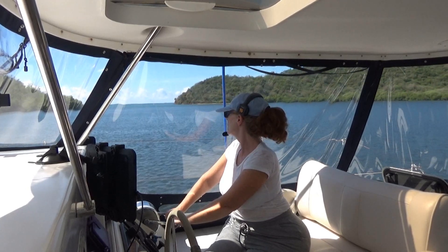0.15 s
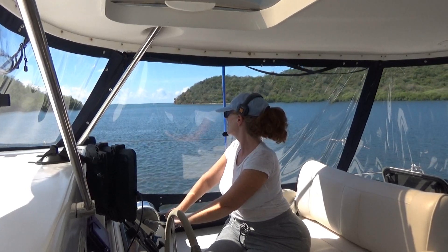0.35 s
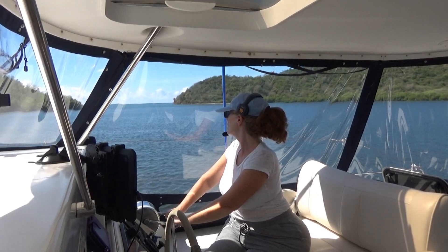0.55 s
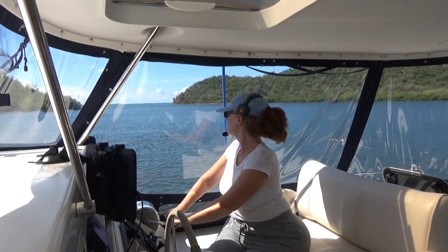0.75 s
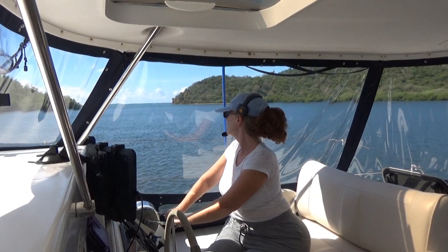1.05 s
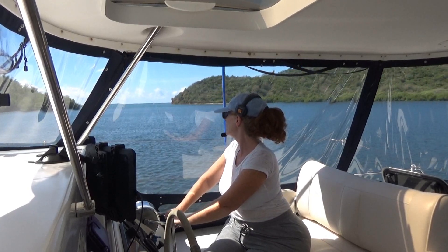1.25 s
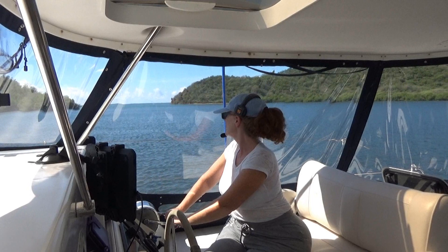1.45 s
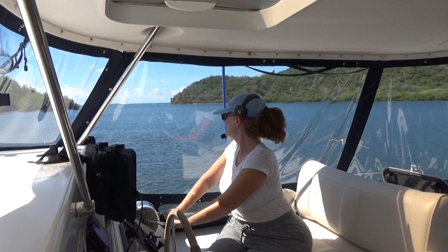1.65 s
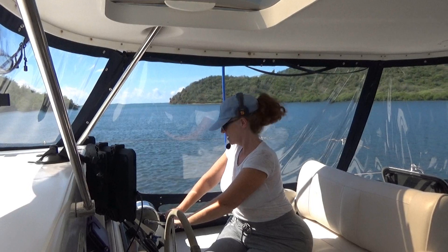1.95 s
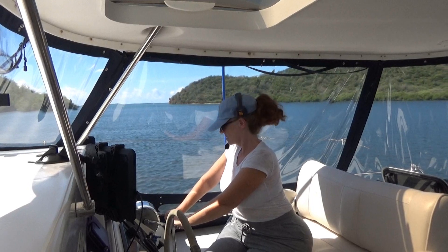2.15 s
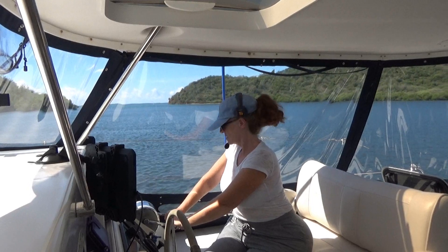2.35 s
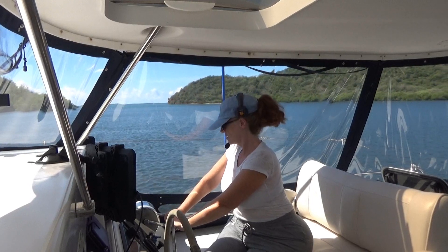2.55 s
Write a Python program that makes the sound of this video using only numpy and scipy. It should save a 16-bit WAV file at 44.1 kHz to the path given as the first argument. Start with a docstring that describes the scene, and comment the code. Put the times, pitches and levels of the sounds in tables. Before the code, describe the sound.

A steady low diesel rumble fills the boat's enclosed helm, two engines beating slightly against each other, the cabin boom swelling and fading; soft knocks come and go, and one engine quickens near the end.

```python
"""Twin marine diesels at idle

Two six-cylinder diesels idle under the deck of a motor boat, heard from the covered helm above.
Harmonic sums locked to each shaft make the exhaust drones, which beat; pulse trains through decaying
modes make the valve ticks. Shaped noise and narrow resonances make the roar and ringing hull panels.
A cabin boom swells and sinks, dull thuds knock, and the slower engine speeds up at the end."""
import sys
import numpy as np
from scipy import signal
from scipy.fft import rfft, irfft
from scipy.io import wavfile
from scipy.ndimage import uniform_filter1d

SR = 44100
rng = np.random.default_rng(int(sys.argv[2]) if len(sys.argv) > 2 else 0)


def persist_wave(psi):
    """Save psi, clipped to +-1, as 16-bit WAV."""
    counts = np.round(np.clip(psi, -1, 1) * 32767).astype(np.int16)
    wavfile.write(sys.argv[1], SR, np.atleast_2d(counts).T)


N = 119070  # samples


def gain_of(db):
    """Level definition: amplitude ratio from dB."""
    return 10 ** (np.asarray(db) / 20)


def evened(x):
    """Normalization by mean power: scales to rms 1."""
    return x / np.sqrt(np.mean(x ** 2) + 1e-20)


def read(points, hz):
    """Interpolation of a spectrum table on a logarithmic frequency axis."""
    f, value = np.transpose(points)
    return np.interp(np.log(hz + 1), np.log(f + 1), value)


def curve(points):
    """Linear interpolation of a time table at every sample."""
    return np.interp(np.arange(N) / SR, *np.transpose(points))


def wander(top_hz):
    """Superposition of slow sines with random phases: a fluctuation of rms 1."""
    t = np.arange(0, N + 256, 256) / SR
    slow = sum(np.sin(2 * np.pi * (f * t + rng.random())) / np.sqrt(f)
               for f in np.geomspace(top_hz / 12, top_hz, 12))
    return np.interp(np.arange(N) / SR, t, evened(slow))


# shaft speed of each engine: t/s, f/Hz (turns per second)
FAST_SPEED = [(0, 17.336), (2.7, 17.336)]
SLOW_SPEED = [(0, 16.072), (2.2, 16.072), (2.41, 17.0), (2.7, 17.35)]


def shaft_turns(speed):
    """Phase as the integral of frequency: turns made since the start."""
    return np.cumsum(curve(speed)) / SR


# exhaust tones: multiple of the shaft speed, rms level/dB before drone level and waver
FAST_ORDERS = [(2, -60), (3, -44), (7, -51.5), (8, -71.5), (9, -31.5), (10, -41), (13, -44), (15, -47.5),
               (17, -40), (18, -35.5), (20, -40), (21, -40.5), (22, -45)]
SLOW_ORDERS = [(2, -43), (3, -38), (4, -37.5), (6, -39.5), (8, -33), (9, -25.5), (10, -54), (11, -34.5),
               (12, -44.5), (14, -46), (16, -43.5), (17, -38.5), (19, -48.5), (22, -40), (25, -52.5),
               (28, -42.5)]
# gain of the whole exhaust drone: t/s, level/dB
FAST_DRONE = [(0, 2.5), (.3, -5), (.8, 1.5), (1.3, -1.5), (1.65, 3), (1.85, -6), (2.2, 0.5), (2.45, -0.5),
              (2.7, -1)]
SLOW_DRONE = [(0, 0), (.08, -6), (.3, -4), (.6, -5), (1.0, -1), (1.9, 0.5), (2.2, -2.5), (2.45, -3.5),
              (2.7, -5)]
FAST_FIRES_AT, SLOW_FIRES_AT = .913, .056  # place of a firing in the turn, 0-1
FIRINGS = 3  # firings a turn
WAVER_DB, WAVER_HZ = 2.5, 5.044  # rms depth, fastest rate


def exhaust(turns, fires_at, orders, drone):
    """Fourier synthesis of shaft orders, each wavering; firing orders crest together at each firing."""
    out = np.zeros(N)
    for order, db in orders:
        # multiples of the firing rate share a phase, the other orders take a random one
        phase = rng.random() * (order % FIRINGS > 0)
        level = np.sqrt(2) * gain_of(db + WAVER_DB * wander(WAVER_HZ))
        out += level * np.cos(2 * np.pi * (order * (turns - fires_at) + phase))
    return gain_of(curve(drone)) * out


# valve ticks in each turn: place in the turn 0-1, relative level/dB, centre of the ringing region f/Hz
FAST_TICKS = [(.02, -5, 6500), (.19, -1, 7250), (.365, 1, 5300), (.52, -5, 5300), (.69, -7, 5600),
              (.86, -6, 5300)]
SLOW_TICKS = [(.13, -6, 9400), (.30, -6, 8700), (.465, 0, 9500), (.635, -3, 10500), (.80, -3, 6600),
              (.97, -5, 8700)]
# modes of the engine castings: f/Hz
FAST_MODE_HZ = [3067, 4310, 4884, 5200, 5306, 5414, 6635, 7152, 7251, 7740, 11280]
SLOW_MODE_HZ = [5738, 6348, 6429, 7250, 8350, 8645, 8709, 8888, 9420, 9870, 10490, 11280, 11800]
# ring of each mode, in the same order: relative level/dB, t60/s
FAST_RINGS = [(-14, .04), (-12, 0.056), (-17, .04), (-3.5, 0.043), (0, 0.072), (-16, .03), (-4.5, 0.023),
              (-5.5, 0.023), (-3.5, .055), (-8, 0.023), (-4, .02)]
SLOW_RINGS = [(-5, 0.11), (-5.5, 0.038), (-2.5, 0.044), (-5, 0.045), (-7, 0.027), (-10, 0.027), (-4, 0.044),
              (-8, 0.044), (-3.5, 0.027), (-4, 0.024), (-1.5, 0.018), (-2, .02), (-3, 0.033)]
# rms level of the faster engine's ticking: t/s, level/dB
FAST_CLATTER = [(0, -50), (1.4, -51.5), (2.0, -54.5), (2.3, -59), (2.7, -54)]
SLOW_CLATTER_DB = -51  # rms level
TICK_SPREAD_DB, TICK_JITTER_S = 1.6, .000015  # standard deviations of tick level and time
CHATTER_S, RATTLE = .003, .35  # decay time constant, rattle gain
REGION_OCT = 0.85  # distance from the region's centre at which a mode is 4.6 dB down


def valves(turns, ticks, mode_hz, rings, level_db):
    """Impulse excitation of modes: chatter repeats every turn, and a loose rattle blurs the repeat."""
    t, out = np.arange(4000) / SR, np.zeros(N)
    puff = np.exp(-t[:500] / CHATTER_S)
    puff /= np.linalg.norm(puff)
    for place, db, region_hz in ticks:
        at = np.flatnonzero(np.diff(np.floor(turns - place)))
        late, size = rng.standard_normal((64, 2))[:len(at)].T
        at = np.clip(at + np.round(late * TICK_JITTER_S * SR).astype(int), 0, N - 1)
        train = np.zeros(N)
        train[at] = gain_of(db + TICK_SPREAD_DB * size)
        # one noise burst serves every turn; the rattle is new noise each time
        burst = puff * rng.standard_normal(len(puff))
        chatter = train + .5 * signal.oaconvolve(train, burst)[:N]
        rattle = signal.oaconvolve(train, puff)[:N] * rng.standard_normal(N)
        ring = np.zeros(len(t))
        for hz, (mode_db, t60) in zip(mode_hz, rings):
            off_region_db = 4.6 * (np.log2(hz / region_hz) / REGION_OCT) ** 2
            decay = gain_of(mode_db - off_region_db - 60 * t / t60)
            ring += decay * np.sin(2 * np.pi * (hz * t + rng.random()))
        ring *= np.minimum(t / 0.0003, 1)  # soft onset
        out += signal.oaconvolve(chatter + RATTLE * rattle, ring)[:N]
    return gain_of(level_db) * evened(out)


# exhaust, water and block noise: f/Hz, relative level/dB per Hz before the deck's dulling
ROAR = [(12, -50), (20, -18), (53, -21), (91, -5), (142, -1), (164, -1.5), (223, -7), (369, -12),
        (449, -15), (516, -22.5), (703, -21.5), (1040, -32), (1270, -34.5), (1580, -29), (1880, -38),
        (2700, -37), (4600, -44), (5440, -37.5), (8050, -42.5), (8760, -39.5), (11600, -44.5), (13000, -56),
        (16200, -60)]
# swell of the bass roar: t/s, level/dB
RUMBLE = [(0, 1), (.15, -1.5), (.28, -0.5), (.34, -1), (.45, 1.5), (.62, -2.5), (1.0, -1.5), (1.35, 0.5),
          (1.75, -0.5), (1.95, 2.5), (2.03, -3.5), (2.3, 1.5), (2.55, 1.5), (2.7, 0.5)]
ROAR_DB, RUMBLE_HZ = -23.5, 260  # rms level, frequency where the swell's dB are halved
DULL_LOW_HZ, DULL_HIGH_HZ, DULL_DB = 5000, 12000, -4  # band that the deck dulls


def roar():
    """Spectral shaping of random noise: wide roar in drifting patches, its bass swelling."""
    frames, hz = N // 256 + 5, np.fft.rfftfreq(2048, 1 / SR)
    real, imag, patches = rng.standard_normal((frames // 2 + 3, len(hz), 3)).T
    patches = uniform_filter1d(patches, size=12, axis=0)  # across frequency
    patches = evened(uniform_filter1d(patches, size=6, axis=1))  # across time
    frame_s = np.arange(real.shape[1]) * 512 / SR - 1024 / SR
    bass = 1 / (1 + (hz / RUMBLE_HZ) ** 4)
    swell = bass[:, None] * np.interp(frame_s, *np.transpose(RUMBLE))
    dulled = (hz > DULL_LOW_HZ) & (hz < DULL_HIGH_HZ)
    spectrum_db = read(ROAR, hz) + DULL_DB * dulled
    shaped = (real + 1j * imag) * gain_of(spectrum_db[:, None] + 1.02 * patches + swell)
    wide = signal.istft(shaped, nperseg=2048, noverlap=1536)[1]
    return gain_of(ROAR_DB) * evened(wide[1024:N + 1024])


# hull panels: f/Hz, bandwidth/Hz, rms level/dB
HULL = [(457.6, 37, -47.5), (567, 17.6, -46), (670.6, 66, -48), (728, 27, -47), (1139, 20, -57),
        (1369, 64, -56), (1594, 67, -51), (2664, 460, -57.5), (3034, 25, -63)]


def hull_panels():
    """Resonance under random drive: each panel is noise through a damped resonator."""
    out, t = np.zeros(N), np.arange(N) / SR
    for f_hz, width, db in HULL:
        r = np.exp(-np.pi * width / SR)
        drive = rng.standard_normal((N, 2)) @ [1, 1j]
        envelope = signal.lfilter([1], [1, -2 * r, r * r], drive)  # two equal poles
        out += gain_of(db) * evened((envelope * np.exp(2j * np.pi * f_hz * t)).real)
    return out


# cabin boom: t/s, rms level/dB
BOOM = [(0, -55), (.2, -25.5), (.5, -30.5), (.75, -19.5), (1.0, -23), (1.15, -25.5), (1.35, -25.5),
        (1.65, -18), (1.85, -28), (2.1, -24), (2.25, -20.5), (2.38, -16.5), (2.45, -23), (2.53, -15),
        (2.63, -27), (2.7, -13.5)]
BOOM_ORDER = 6  # multiple of the faster shaft's speed


def cabin_boom(turns):
    """Forced response: the cabin booms at one order of the faster engine, at a varying level."""
    tone = np.cos(2 * np.pi * BOOM_ORDER * (turns - FAST_FIRES_AT))
    return np.sqrt(2) * gain_of(curve(BOOM)) * tone


# dull low thuds: t/s, level/dB before the onset ramp and decay, f/Hz, t60/s
THUDS = [(.294, -2.5, 310, 0.024), (0.516, -3, 144, 0.038), (1.645, -10, 129, .04), (1.883, -4, 151, 0.042),
         (1.965, -4.5, 147, 0.067), (2.585, -12.5, 205, 0.075)]


def thuds():
    """Damped free vibration: short dull knocks through the hull."""
    out, t = np.zeros(N + SR), np.arange(SR // 8) / SR
    for s, db, hz, t60 in THUDS:
        decay = np.minimum(t / 0.0026, 1) * gain_of(db - 60 * t / t60)
        out[round(s * SR):][:len(t)] += decay * np.sin(2 * np.pi * hz * t)
    return out[:N]


# balance of the ports: f/Hz, left minus right level/dB before the stray part
LEAN = [(60, 1.0), (130, 0.5), (290, 0), (640, -1.0), (1410, -0.5), (3100, 0.0), (6820, 0.5), (15000, 0.0)]
# unrelated part: f/Hz, level/dB relative to the middle
WIDTH = [(50, -25), (500, -28), (1400, -16), (2000, -65), (4500, -59), (5400, -18), (10500, -20.5),
         (11400, -48)]


def two_ports(mid):
    """Sum and difference stereo: a slight lean and a diffuse stray part part the two close ports."""
    hz = np.fft.rfftfreq(N, 1 / SR)
    lean = gain_of(read(LEAN, hz))
    echo = rng.standard_normal(6000) * gain_of(-60 * np.arange(6000) / 6000)
    stray = rfft(echo / np.linalg.norm(echo), N) * gain_of(read(WIDTH, hz))
    side = irfft(rfft(mid) * ((lean - 1) / (lean + 1) + stray), N)
    return np.array([mid + side, mid - side])


def scene():
    """Linear superposition of both engines, roar, hull, boom and thuds at two close microphone ports."""
    fast, slow = shaft_turns(FAST_SPEED), shaft_turns(SLOW_SPEED)
    mid = exhaust(fast, FAST_FIRES_AT, FAST_ORDERS, FAST_DRONE)
    mid += exhaust(slow, SLOW_FIRES_AT, SLOW_ORDERS, SLOW_DRONE)
    mid += valves(fast, FAST_TICKS, FAST_MODE_HZ, FAST_RINGS, curve(FAST_CLATTER))
    mid += valves(slow, SLOW_TICKS, SLOW_MODE_HZ, SLOW_RINGS, SLOW_CLATTER_DB)
    mid += roar() + hull_panels() + cabin_boom(fast) + thuds()
    return two_ports(mid)


LOW_CUT_HZ, EDGE_HZ = 34, 16400  # microphone low cut, upper band limit


def record(dry):
    """Linear filtering: microphone low cut, then the band limit."""
    low_cut = signal.butter(2, LOW_CUT_HZ, "high", fs=SR, output="sos")
    band_limit = signal.firwin(511, EDGE_HZ, window=("kaiser", 9), fs=SR)
    return signal.oaconvolve(signal.sosfilt(low_cut, dry), band_limit[None], "same")


dry = scene()
out = record(dry)
persist_wave(out)
```